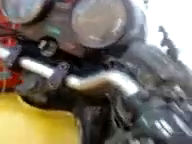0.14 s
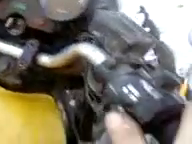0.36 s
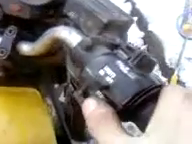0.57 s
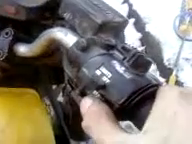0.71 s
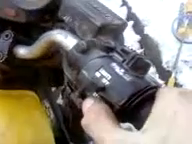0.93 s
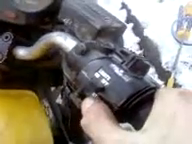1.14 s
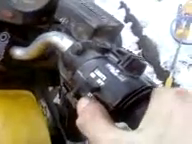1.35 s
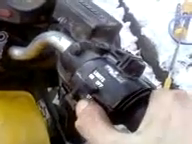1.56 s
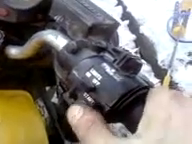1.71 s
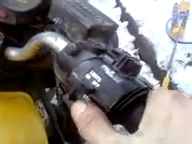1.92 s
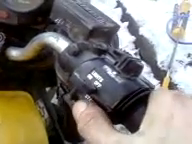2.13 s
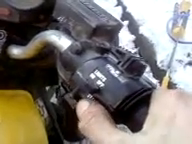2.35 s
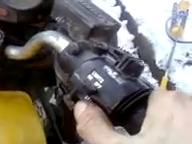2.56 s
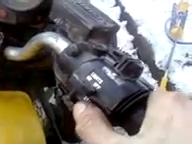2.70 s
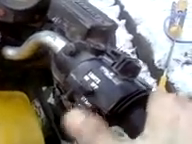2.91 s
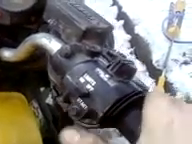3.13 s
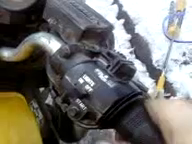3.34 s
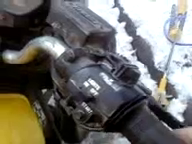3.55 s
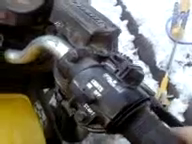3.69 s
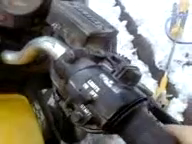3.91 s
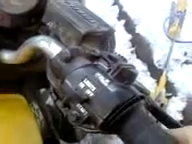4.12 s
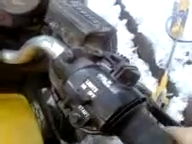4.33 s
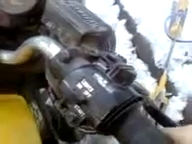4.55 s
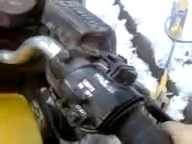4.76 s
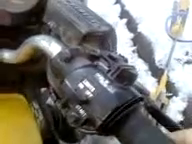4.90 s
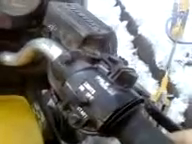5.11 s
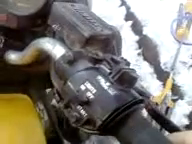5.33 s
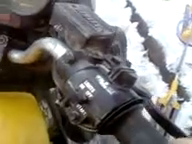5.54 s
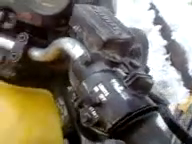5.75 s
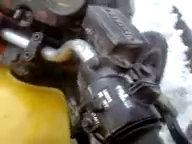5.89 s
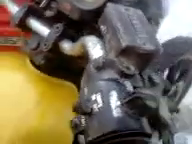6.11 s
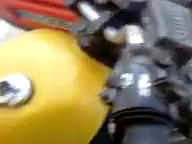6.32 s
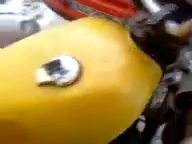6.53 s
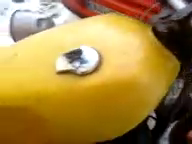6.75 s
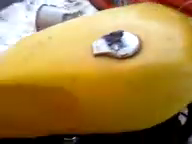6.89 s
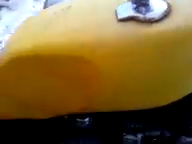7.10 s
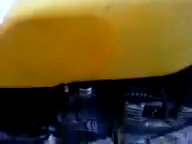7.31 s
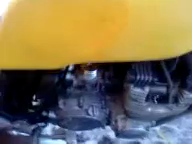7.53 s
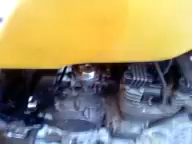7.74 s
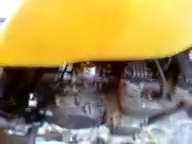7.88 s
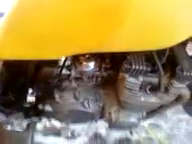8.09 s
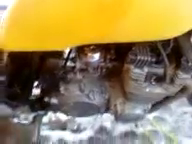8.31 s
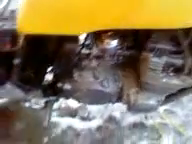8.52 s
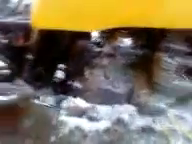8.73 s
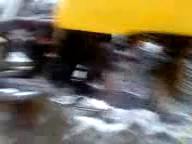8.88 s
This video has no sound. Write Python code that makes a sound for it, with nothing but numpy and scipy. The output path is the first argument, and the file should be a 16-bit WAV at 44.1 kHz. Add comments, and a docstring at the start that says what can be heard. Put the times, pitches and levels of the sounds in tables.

```python
"""A four-cylinder motorcycle outdoors: firing pulses ring its pipes, tappets tick and a loose clutch knocks.
The starter's gear teeth grind twice, the engine catches, is blipped three times and settles to a lumpy idle
with one weak cylinder, then picks up again. Switch clicks, puffs, clanks and a faint yard lie around it.
The microphone starts at the handlebar and then moves down close beside the engine; the narrow-band recorder
overloads on the revs."""
import sys
import numpy as np
from scipy import signal
from scipy.fft import rfft, irfft, next_fast_len
from scipy.io import wavfile
from scipy.ndimage import uniform_filter1d

SR = 44100
rng = np.random.default_rng(int(sys.argv[2]) if len(sys.argv) > 2 else 0)


def wav_out(sig):
    """Save sig, one row per channel (or a flat mono array), as 16-bit PCM at SR to the path in sys.argv[1]."""
    wavfile.write(sys.argv[1], SR, np.round(np.clip(np.atleast_2d(sig).T, -1, 1) * 32767).astype(np.int16))


N = 394694
TIME = np.arange(N) / SR

# Microphone place over time: time_s, beside (0 at the handlebar, 1 right beside the engine)
MIC_PLACE = [(6.9, 0.031), (7.4, 0.79)]
BAND_TOP_HZ, OVERLOAD = 3290, 0.72   # overload as a share of full scale
CUTOFF_HZ = 15900   # nothing remains above this after the overload

# Outdoor rumble, spectrum shape: frequency_hz, density_db (per Hz, relative)
YARD_COLOUR = [(18, -39), (30, -9), (113, 3), (161, 3), (214, -6), (283, -0.5), (476, -10), (868, -15),
               (2140, -35.5), (3130, -34.5), (3600, -41.5), (4680, -66.5), (7920, -120)]
YARD_DB = -50.5
# Hand brushing the grip: time_s, level_db (before the rustle gain)
RUSTLE = [(0.0, -63), (0.244, -61.5), (0.382, -53), (0.734, -65), (0.902, -67), (1.1, -61)]
# Switch and solenoid clicks: time_s, level_db (before the click gain), band_hz (near its upper edge)
CLICKS = [(0.182, -31, 2650), (0.246, -34, 2620), (.963, -43, 1200), (1.091, -32, 2000),
          (1.144, -30.5, 1100), (1.155, -9, 1080), (2.354, -12.5, 1119)]
# Puffs of unfired cylinders: time_s, level_db (before the puff gain)
PUFFS = [(1.155, -27.5), (1.372, -35), (1.604, -22.5), (1.774, -23), (1.85, -20.5), (2.354, -23),
         (2.559, -29)]

# Starter turning: start_s, end_s, level_db (before spectrum and judder)
CRANKING = [(1.163, 1.899, -28), (2.358, 2.783, -30)]
# Starter labouring against compression: start_s, end_s, level_db (at its onset, before spin-up and lag)
SURGES = [(1.205, 1.398, -16.5), (1.494, 1.554, -17), (1.618, 1.645, -14), (1.699, 1.772, -16.5),
          (1.844, 1.926, -23.5), (2.409, 2.606, -17), (2.664, 2.735, -18)]
SURGE_SAG_DB_PER_S = 8   # each surge eases as it goes on
SPIN_UP_S, SPIN_UP_DB = .22, -9   # after each press the motor gathers force
# Starter grind, spectrum shape: frequency_hz, density_db (per Hz, relative)
STARTER_COLOUR = [(71, -34), (120, -16.5), (194, -25.5), (280, -8.5), (361, -11), (626, -10), (853, -9.5),
                  (1270, -3.5), (1680, -7), (2950, -19.5), (3260, -14), (3500, -19), (4550, -27),
                  (7700, -120)]

# Clanks of the first firings, of the blips, and stray loud knocks at idle:
# time_s, level_db (before the clank gain), pitch_hz, width_hz
CLANKS = [(2.805, -22.5, 1990, 1499), (2.871, -22.5, 1270, 900), (2.93, -22.5, 1180, 196),
          (3.234, -28, 1380, 910), (4.16, -16, 1480, 400), (4.246, -18.5, 1400, 300),
          (4.325, -17, 1404, 400), (4.687, -19, 1280, 203), (4.946, -17.5, 1620, 298),
          (5.89, -20.5, 1280, 400), (6.236, -26, 1520, 900), (7.827, -20, 2320, 1187),
          (8.532, -28, 1390, 885)]
# Clutch knocks, one per crank turn: place_cycle (0-1), above_db (from the handlebar), beside_db (by the engine)
KNOCKS = [(.0, -8.5, -3), (0.487, -5.5, -9.5)]
# Clutch knock level over time, before it fades with speed: time_s, level_db
KNOCK_LEVEL = [(4.0, -29), (4.6, -25.5), (5.9, -27.5), (6.95, -19.5), (7.2, -29.5), (7.45, -24),
               (8.3, -19.5)]
# Clutch and crankcase resonances: pitch_hz, width_hz, level_db (the starter raises the pitches a little)
CASE_MODES = [(1181.8, 20.4, -1), (1317, 60, -7), (1397, 56, -10), (1639, 130, -13.5), (2377, 63, -16),
              (3180, 54, -24)]
# above this speed the clutch knock fades, over this span, by this much
RATTLE_RPM, RATTLE_FADE_RPM, RATTLE_LOSS_DB = 1362, 148, -21.5

# Valve and cam chain contacts: place_cycle (0-1), level_db, ring_hz
TAPPETS = [(0.041, -5.5, 2356), (0.191, -7, 2990), (0.309, -4, 1994), (.41, -6.5, 1602), (0.503, -9, 2367),
           (.6, -3.5, 1500), (0.7, -7.5, 1786), (0.932, -7, 2674)]
# Valve clatter, spectrum shape: frequency_hz, density_db (per Hz, relative)
CLATTER_COLOUR = [(350, 9.5), (550, 3.5), (800, 3.5), (1100, 1), (1500, -1.5), (2000, -4.5), (2400, -2.5),
                  (3000, -2), (3600, -2), (4500, -9.5)]

# Firings: place_cycle (0-1 in two turns), boom_db, bark_db, tuning (ratio to the pipe modes), echo_s
CYLINDERS = [(.125, -2, 2, .99, 0.00947), (0.386, -1, 2, 1.01, 0.00807), (.65, -3.5, 0.5, 1.0, .0095),
             (.86, -6.5, -0.5, 1.0, 0.0076)]
# Low exhaust pipe resonances, before each cylinder's tuning: pitch_hz, width_hz, level_db
BOOM_MODES = [(79.8, 19.7, -3), (122.74, 12.9, 0), (151, 19.7, -8), (175.2, 22.3, -3)]
# Upper exhaust pipe resonances, before each cylinder's tuning: pitch_hz, width_hz, level_db
BARK_MODES = [(250.5, 31.5, -6), (283.24, 9.9, 5.5), (318.8, 14, -4), (374.5, 18.9, -3.5),
              (498.4, 126, -22)]
# Air box honk and rasp with the throttle open: pitch_hz, width_hz, level_db
AIR_BOX = [(187, 43.5, 0), (488, 226, -13)]
INTAKE_DB = -9   # at full throttle
# Crankcase boom, heard from close by: pitch_hz, width_hz, level_db (before the microphone place)
CRANKCASE_BOOM = [(151.1, 11, -3.5)]
# the pipes boom cleanly as the firing rate or its double sweeps through their tuning
PIPE_TUNING_HZ, PIPE_SPAN_HZ, PIPE_BOOM_SHARE = 100.2, 12, 0.56
PIPE_FLOW_S, PIPE_FLOW_THROTTLE = 0.097, 0.34   # how long gas flow lingers, and the throttle that suffices
DRONE_SHARE = 0.63   # of the roar's power, at most

# Twists of the throttle: opened_s, let_go_s, opening (0-1)
BLIPS = [(4.086, 4.287, .348), (4.636, 4.827, .509), (4.937, 5.152, 0.98), (8.68, 8.955, .155)]
OPEN_S, SHUT_S = .04, .08   # the grip is twisted open, and springs back
FULL_THROTTLE_RPM, FLYWHEEL_S = 3392, .341   # speed full throttle would add, and the lag of the crank
CHARGE_S = 0.027   # the burn lags the grip
# Speed it would settle to with the throttle shut, dipping towards 5.8 s: time_s, speed_rpm
IDLE = [(2.75, 992.3), (3.85, 1122.4), (5.8, 983.3), (6.3, 1127.3), (7.0, 1195.8), (7.75, 1212.6),
        (8.05, 1189), (8.7, 1207.3)]
WARM_IDLE_RPM = 1200   # reference speed for loudness
CYCLE_START_S = 7.237   # a two-turn cycle begins here
CATCH_S, CATCH_RISE_S = 2.78, 0.0024
FIRM_S, FIRMING_S = 3.066, .13   # it fires firmly by this time, after stumbling
WARM_UP_S = 1.0

# Loudness of three engine parts, one row each: idle_db (warm), then added full_throttle_db,
# speed_db (per doubling), beside_db (microphone by the engine), stumble_db, cold_db
BOOM_LAW = (-15, 5.5, 4, 2, -9.5, 2)
BARK_LAW = (-20, 3.5, 6.5, -3.5, -5, -5.5)
CLATTER_LAW = (-25, 2, 3.5, 5, -6, 4)


def from_db(db):
    """Decibels to gain."""
    return 10 ** (np.asarray(db) / 20)


def rms_one(x):
    """Scale to unit power."""
    return x / np.sqrt(np.mean(x ** 2) + 1e-20)


def levelled(x, size=6615):
    """Even out the power over a sliding stretch of size samples, 0.15 s unless given."""
    power = uniform_filter1d(uniform_filter1d(x ** 2, size), size // 2)
    return x / np.sqrt(np.abs(power) + 1e-4 * np.mean(x ** 2))


def in_time(rows):
    """Curve columns at every sample."""
    s, *columns = np.transpose(rows)
    return [np.interp(TIME, s, c) for c in columns]


def noise():
    """White noise."""
    return rng.standard_normal(N)


def butter(x, hz, kind, order=2):
    """Butterworth filter."""
    sos = signal.butter(order, np.clip(hz, 10, .45 * SR), kind, fs=SR, output="sos")
    return signal.sosfilt(sos, x + 1e-18)


def coloured(x, spectrum):
    """Give x a spectrum, falling away further beyond its ends; unit power."""
    hz, db = np.transpose(spectrum)
    size = next_fast_len(N + 4096)
    f = np.maximum(np.arange(size // 2 + 1) * SR / size, 1)
    gain = from_db(np.interp(np.log(f), np.log(hz), db))
    gain = gain * np.minimum(f / hz[0], 1) ** 2 * np.minimum(hz[-1] / f, 1) ** 2
    return rms_one(irfft(rfft(x, size) * gain, size)[:N])


def resonate(x, modes, tuning=1):
    """Parallel resonances with alternating signs."""
    out = 0
    for k, (hz, width, db) in enumerate(modes):
        r = np.exp(-np.pi * width / SR)
        poles = [1, -2 * r * np.cos(2 * np.pi * hz * tuning / SR), r * r]
        ringing = (1 - r * r) / 2 * signal.lfilter([1, 0, -1], poles, x + 1e-18)
        out = out + (-1) ** k * from_db(db) * ringing
    return out


def fade(x, seconds):
    """Each impulse becomes an exponential decay of the same height."""
    return signal.lfilter([1], [1, -np.exp(-1 / (seconds * SR))], x + 1e-18)


def lagged(x, seconds):
    """Follow x with inertia."""
    return fade(x, seconds) / (seconds * SR)


def ramp(start, seconds):
    """Rises from 0 to 1 in a straight line."""
    return np.clip((TIME - start) / seconds, 0, 1)


def impulses(times, db):
    """Single-sample blows at the given times and levels."""
    out = np.zeros(N)
    out[np.clip(np.round(np.asarray(times) * SR).astype(int), 0, N - 1)] = from_db(db)
    return out


def scatter(x, decay_s, direct=0.38):
    """Frame, tank and fins hand a sound on as a dense burst of tiny reflections."""
    t = np.arange(2048) / SR
    response = rng.standard_normal(len(t)) * np.exp(-t / decay_s)
    response = response / np.linalg.norm(response)
    return direct * x + signal.fftconvolve(x, response)[:N]


def each_cycle(cycle, place, spread_db, jitter_s):
    """One blow whenever the engine passes a place in its cycle, never quite alike."""
    passes = np.arange(np.ceil(cycle[0]), cycle[-1] - place) + place
    times = np.interp(passes, cycle, TIME)
    lateness, strength = rng.standard_normal((2, len(times)))
    return impulses(times + jitter_s * lateness, spread_db * strength)


def loudness(law, throttle, rpm):
    """Gain of an engine part from throttle, speed, microphone place and time since it caught."""
    idle_db, throttle_db, octave_db, beside_db, stumble_db, cold_db = law
    stumbling = 1 - ramp(FIRM_S - FIRMING_S, FIRMING_S)
    cold = 1 - ramp(CATCH_S, WARM_UP_S)
    driving_db = throttle_db * np.sqrt(throttle) + octave_db * np.log2(rpm / WARM_IDLE_RPM)
    starting_db = stumble_db * stumbling + cold_db * cold
    return from_db(idle_db + driving_db + beside_db * in_time(MIC_PLACE)[0] + starting_db)


def yard(rustle_gain_db=-1):
    """Faint outdoor rumble as shaped noise, and the hand brushing the grip as band noise."""
    brushing = rms_one(butter(noise(), [1100, 3600], "band"))
    rustle = from_db(in_time(RUSTLE)[0] + rustle_gain_db) * brushing
    return from_db(YARD_DB) * coloured(noise(), YARD_COLOUR) + rustle


def switches(ring_s=0.0026, gain_db=-6):
    """Handlebar switch and solenoid: short dry clicks of fast-dying band noise."""
    out = 0
    for s, db, hz in CLICKS:
        snap = rms_one(butter(noise(), [hz / 3, hz * 1.04], "band", order=1))
        out = out + fade(impulses([s], db + gain_db), ring_s) * snap
    return out


def puffs(length_s=0.038, gain_db=-6, pipe_hz=203, pipe_width_hz=1.9, pipe_db=8):
    """Unburnt charges thud through the pipes, which hum on briefly."""
    times, levels_db = np.transpose(PUFFS)
    gas = fade(impulses(times, levels_db), length_s) * rms_one(butter(noise(), [55, 190], "band"))
    hum = resonate(gas, [(pipe_hz, pipe_width_hz, pipe_db)])
    return from_db(gain_db) * (gas + hum)


def starter(unloaded_mesh_hz=700, sag=.38, inertia_s=.06, whine_db=-4.0, tooth_db=16, case_db=-12,
            coast_s=0.041, surge_s=.007, judder_db=1.0):
    """Gear teeth grind into the crankcase, louder and slower on every compression."""
    turning = sum(from_db(db) * ((TIME > on) & (TIME < off)) for on, off, db in CRANKING)
    turning = np.maximum(turning, lagged(turning, coast_s))
    spin_up_db = SPIN_UP_DB * sum((TIME > on) * (1 - ramp(on, SPIN_UP_S)) for on, off, db in CRANKING)
    load = 0
    for on, off, db in SURGES:
        easing_db = SURGE_SAG_DB_PER_S * np.clip(TIME - on, 0, off - on)
        load = load + from_db(db - easing_db) * ((TIME > on) & (TIME < off))
    load = lagged(load * from_db(spin_up_db), surge_s)
    drag = fade(load, inertia_s)   # the motor slows while the load lasts
    slipping = 1 + .035 * rms_one(butter(noise(), 90, "low"))
    mesh_hz = unloaded_mesh_hz * slipping * (1 - sag * drag / drag.max())
    teeth = np.diff(np.floor(np.cumsum(mesh_hz) / SR), prepend=0)
    # worn teeth strike unevenly: a whine with a coarse grind around it
    coarse = rms_one(noise() + scatter(from_db(tooth_db) * noise() * teeth, 0.0035))
    whine = rms_one(scatter(teeth, 0.0016))
    grind = coarse + from_db(whine_db) * whine
    case = rms_one(resonate(grind, CASE_MODES, tuning=1.08))
    ringing = coloured(grind, STARTER_COLOUR) + from_db(case_db) * case
    judder = from_db(judder_db * rms_one(butter(noise(), 45, "low")))
    return np.hypot(turning, load) * judder * ringing


def clanks(ring_s=0.017, gain_db=3):
    """Clanks of the first firings, of the blips, and stray loud knocks at idle: bursts of resonant noise."""
    out = 0
    for s, db, hz, width in CLANKS:
        metal = levelled(resonate(noise(), [(hz, width, 0)]), size=600)
        out = out + fade(impulses([s], db + gain_db), ring_s) * metal
    return out


def clutch_knock(cycle, rpm, chatter_s=0.023, buzz_db=-14, ring_hz=1190, ring_s=0.015, swell_s=0.0023,
                 ring_db=-3, chatter_db=-3.5):
    """The loose basket chatters once a turn, and its ring swells and dies in a few hundredths of a second."""
    beside, = in_time(MIC_PLACE)
    blows = 0
    for place, above_db, side_db in KNOCKS:
        heard = from_db(above_db + (side_db - above_db) * beside)
        blows = blows + heard * each_cycle(cycle, place, spread_db=4.0, jitter_s=0.0014)
    chatter = resonate(noise() * (fade(blows, chatter_s) + from_db(buzz_db)), CASE_MODES)
    # the shifting contact bends the ring
    pitch = ring_hz * (1 + .04 * rms_one(butter(noise(), 68.87, "low")))
    ring = fade(fade(blows, swell_s), ring_s) * np.sin(2 * np.pi * np.cumsum(pitch) / SR)
    too_fast = np.clip((rpm - RATTLE_RPM) / RATTLE_FADE_RPM, 0, 1)
    level_db = in_time(KNOCK_LEVEL)[0] + RATTLE_LOSS_DB * too_fast
    return from_db(level_db) * (from_db(chatter_db) * levelled(chatter) + from_db(ring_db) * levelled(ring))


def valve_clatter(cycle, throttle, rpm, ring_s=0.02, tick_db=14, chain_db=-10, own_ring_db=9, width_hz=350):
    """Tappets tick and rattle the finned head, each with its own ring, over the steady rush of the chain."""
    rattle = from_db(chain_db) * noise()
    for place, db, hz in TAPPETS:
        blows = from_db(db) * each_cycle(cycle, place, spread_db=2.0, jitter_s=0.0015)
        burst = noise() * fade(blows, ring_s) + from_db(tick_db) * blows
        own_ring = resonate(burst, [(hz, width_hz, 0)])
        rattle = rattle + 1.28 * burst + from_db(own_ring_db) * own_ring
    return loudness(CLATTER_LAW, throttle, rpm) * levelled(coloured(rattle, CLATTER_COLOUR))


def exhaust(cycle, throttle, rpm, echo_db=-9, drone_db=4.0, lock_throttle=0.52, swell_db=3.5):
    """Each firing sends a pressure step and a gust of turbulent gas down its pipe; the air box answers."""
    boom = bark = gulps = 0
    for place, boom_db, bark_db, tuning, echo_s in CYLINDERS:
        pulse = each_cycle(cycle, place, spread_db=1.1, jitter_s=.0002)
        # firings grow more uneven as the throttle opens
        pulse = pulse * from_db(2.2 * np.sqrt(throttle) * noise())
        gust = fade(pulse, .009) * noise() * from_db(-37 + 2 * throttle)
        pulse = pulse + gust
        # long waves return from the open end
        echo = from_db(echo_db) * np.interp(TIME - echo_s, TIME, pulse)
        boom = boom + from_db(boom_db) * resonate(pulse + echo, BOOM_MODES, tuning)
        bark = bark + from_db(bark_db) * resonate(pulse, BARK_MODES, tuning)
        gulps = gulps + from_db(boom_db) * pulse
    boom = boom + in_time(MIC_PLACE)[0] * resonate(gulps, CRANKCASE_BOOM)
    boom = levelled(butter(butter(boom, 48, "high"), 300, "low"))
    bark = levelled(butter(butter(bark, 189, "high"), 900, "low"))
    intake = from_db(INTAKE_DB) * np.sqrt(throttle) * levelled(resonate(gulps, AIR_BOX))

    # fast and wide open, the pipes lock onto a clean drone at three times the firing rate
    firing_hz = len(CYLINDERS) * np.gradient(cycle) * SR
    wide_open = np.clip((throttle - lock_throttle) / .3, 0, 1)
    fast = np.clip((firing_hz - 62) / 8, 0, 1)
    locked = DRONE_SHARE * wide_open * fast
    drone = from_db(drone_db) * np.sqrt(2) * np.sin(2 * np.pi * 3 * len(CYLINDERS) * cycle)
    roar = np.sqrt(1 - locked) * bark + np.sqrt(locked) * drone

    # the clean boom needs gas flow
    flow = np.clip(lagged(throttle, PIPE_FLOW_S) / PIPE_FLOW_THROTTLE, 0, 1)
    for multiple in (1, 2):
        detuning = (multiple * firing_hz - PIPE_TUNING_HZ) / PIPE_SPAN_HZ
        in_tune = PIPE_BOOM_SHARE * flow * np.exp(-detuning ** 2)
        tone = np.sqrt(2) * np.sin(2 * np.pi * multiple * len(CYLINDERS) * cycle)
        boom = np.sqrt(1 - in_tune) * boom + in_tune * from_db(swell_db) * tone
    boom = loudness(BOOM_LAW, throttle, rpm) * np.sqrt(1 - locked) * boom
    return boom + loudness(BARK_LAW, throttle, rpm) * roar + intake


def scene():
    """Starter, then the engine: the throttle drives the crankshaft, and the engine parts follow it."""
    grip = sum(opening * (ramp(opened, OPEN_S) - ramp(let_go, SHUT_S)) for opened, let_go, opening in BLIPS)
    rpm = in_time(IDLE)[0] + FULL_THROTTLE_RPM * lagged(grip, FLYWHEEL_S)
    throttle = np.clip(lagged(grip, CHARGE_S), 0, 1)
    cycle = np.cumsum(rpm) / (2 * 60 * SR)   # two turns to a cycle
    cycle = cycle - np.interp(CYCLE_START_S, TIME, cycle)
    background = yard() + switches() + puffs() + starter() + clanks()
    engine = clutch_knock(cycle, rpm) + valve_clatter(cycle, throttle, rpm) + exhaust(cycle, throttle, rpm)
    return (background + ramp(CATCH_S, CATCH_RISE_S) * engine)[None]


def record(dry):
    """A narrow band with little above about 3.3 kHz, its peaks cut flat, then a steep final low-pass."""
    narrow = butter(butter(dry, BAND_TOP_HZ, "low", order=10), 4600, "low", order=12)
    flat = np.clip(narrow, -OVERLOAD, OVERLOAD)
    return signal.sosfilt(signal.ellip(10, .1, 80, CUTOFF_HZ, fs=SR, output="sos"), flat)


dry = scene()
out = record(dry)
wav_out(out)
```